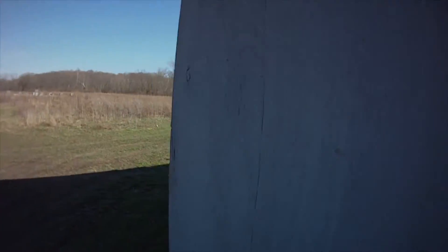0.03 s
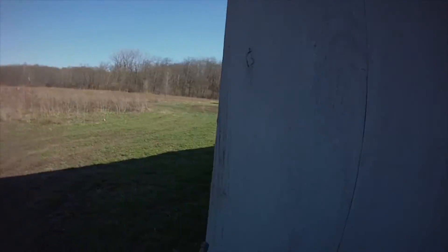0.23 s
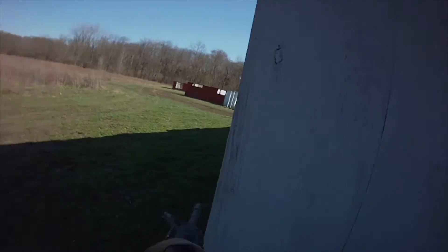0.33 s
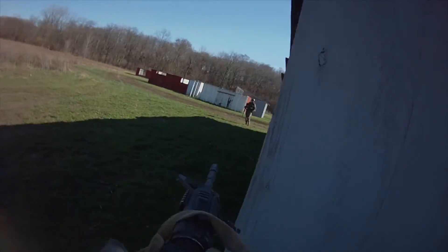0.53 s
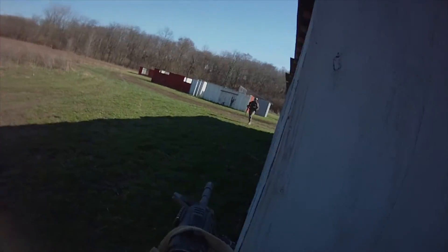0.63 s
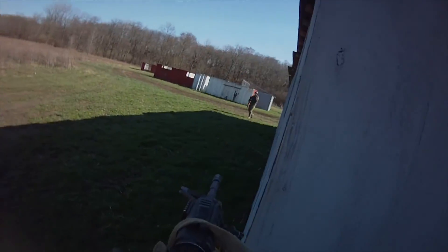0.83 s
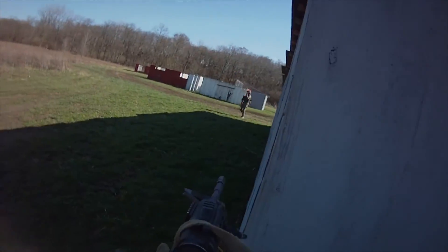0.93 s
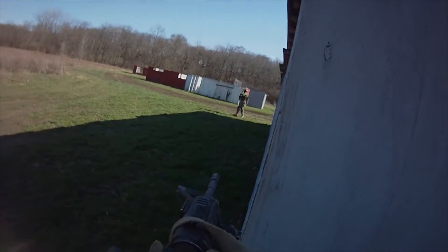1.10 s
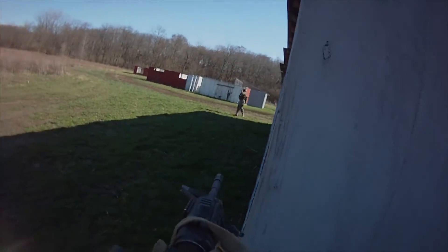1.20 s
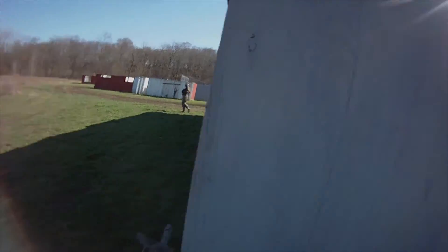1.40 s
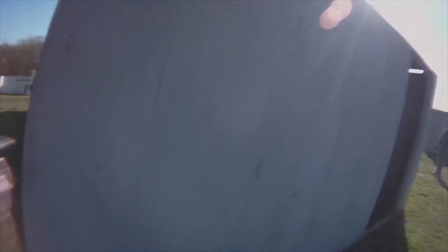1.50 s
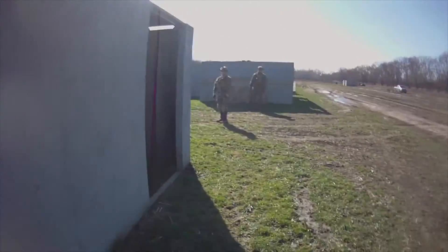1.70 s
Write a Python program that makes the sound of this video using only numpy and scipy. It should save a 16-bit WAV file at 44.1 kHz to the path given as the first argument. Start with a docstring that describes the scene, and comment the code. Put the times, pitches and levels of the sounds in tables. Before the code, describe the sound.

An electric airsoft gun fires six shots, close and dry, on an open field. First come faint clicks and cloth rustle over low wind, with dull hollow knocks at 0.24 and 0.34-0.44 s. From 0.5 s the motor whirs, gears whine downward, and pistons clack about every 0.14 s from 0.61 to 1.32. The whir fades; small clicks follow, then a thin ring and rustle near 1.72.

```python
"""Faint clicks and cloth rustle over a low outdoor floor, then dull knocks, then six quick airsoft shots.
The place is outdoors beside a wall (no echo is computed); the microphone is a helmet camera in a closed housing.
For each shot the motor spins up (hum, coloured noise), the gears whine down under the spring's load (sines),
a catch clicks and the piston slams (struck casing modes). Wind and rustle are shaped noise; knocks are
decaying tones with a crack. After the last shot come small clicks, a thin ring and more rustle."""
import sys
import numpy as np
from scipy import signal
from scipy.fft import rfft, irfft
from scipy.io import wavfile
from scipy.ndimage import uniform_filter1d

SR = 44100
rng = np.random.default_rng(int(sys.argv[2]) if len(sys.argv) > 2 else 0)


def to_linear_factor(level_db):
    """Convert decibel levels (scalar or array-like) to linear amplitude factors."""
    exponent = np.asarray(level_db, float) / 20
    return 10 ** exponent


def bounce(signal):
    """Save signal as a 16-bit WAV file at the path given by the first command-line argument."""
    frames = np.transpose(np.atleast_2d(signal))
    limited = np.clip(frames, -1, 1)
    pcm = np.round(limited * 32767).astype(np.int16)
    wavfile.write(sys.argv[1], SR, pcm)


N = 77175  # samples, 1.75 s

# casing modes that a blow rings: (nominal f/Hz, t60/s)
MODES = [(330, 0.041), (450, 0.044), (580, 0.04), (1400, 0.017), (2700, 0.016), (3900, 0.013),
         (5000, 0.0033), (6800, 0.0078), (10000, 0.00047)]
# piston slams: (t/s, level/dB)
SLAMS = [(0.6121, -4), (0.7641, -1), (0.9052, -1), (1.0507, -0.5), (1.1775, -1.5), (1.3229, -1.5)]
# catch clicks, two for the first shot: (t/s, level/dB)
CATCHES = [(0.5512, -5.5), (0.5554, -2), (0.7127, -3), (0.8552, -4), (1.0001, -3), (1.1273, -1),
           (1.273, -2)]
BURST = 600  # samples in a contact's noise burst
STRIKE = 3.8  # first contact against the rattle that follows
UPPER_MODES_HZ = 2000  # modes above this answer the rattle


def curve(t, rows, axis=1):
    """Join table rows with straight lines."""
    rows = np.array(rows, float)
    return np.interp(t, rows[:, 0], rows[:, axis])


def colour(x, points):
    """Shape a spectrum by (f/Hz, level/dB) points on a log axis."""
    hz = np.maximum(np.arange(N // 2 + 1) * SR / N, 1)
    p = np.array(points, float)
    gain_db = np.interp(np.log(hz), np.log(p[:, 0]), p[:, 1])
    return irfft(rfft(x) * to_linear_factor(gain_db), N)


def unit(x):
    """Scale to rms 1."""
    return x / np.sqrt(np.mean(x ** 2))


def band(x, hz, width):
    """Steep resonance: a band-pass applied twice."""
    b, a = signal.iirpeak(min(hz, SR * 0.45), hz / width, fs=SR)
    return signal.lfilter(b, a, signal.lfilter(b, a, x))


def walk(rate):
    """Smooth random wander, spread 1, averaged twice over 1 / rate seconds."""
    k = int(SR / rate)
    return unit(uniform_filter1d(uniform_filter1d(rng.standard_normal(N), k), k))


def decay(s):
    """Short falling envelope with time constant s."""
    return np.exp(-np.arange(BURST) / (s * SR))


def contacts(shape, fall_s):
    """Noise bursts that open with a sharp contact and rattle away."""
    bursts = rng.standard_normal((*shape, BURST)) * decay(fall_s)
    bursts[..., 0] += STRIKE
    return bursts


def ring(hz, t60, rise, size=3000):
    """A decaying mode with a soft start."""
    t = np.arange(size) / SR
    fall = np.exp(-np.log(1000) * t / t60)
    return np.sin(2 * np.pi * hz * t) * fall * (1 - np.exp(-t / rise))


def add(out, x, s):
    """Mix x into out at time s."""
    i = int(s * SR)
    out[i:i + len(x)] += x[:N - i]


def blows(events, drive, rattle_s):
    """A blow rattles against the upper casing modes and gives the low ones a single push."""
    out = np.zeros(N)
    shape = (len(events), len(drive))
    rattle = contacts(shape, rattle_s)
    tune = 1 + 0.02 * rng.standard_normal(shape)  # no two blows ring quite alike
    for (s, db), bursts, shifts in zip(events, rattle, tune):
        for (hz, t60), (mode_db, lag), burst, shift in zip(MODES, drive, bursts, shifts):
            x = ring(hz * shift, t60, 0.00015)
            if hz > UPPER_MODES_HZ:
                x = signal.fftconvolve(x, burst)
            add(out, to_linear_factor(db + mode_db) * x / np.abs(x).max(), s + abs(lag))
    return out


def field():
    """Light wind and far-off outdoor noise: common part and left-right part, both slowly wavering."""
    # colour of the outdoor floor: (f/Hz, level/dB)
    floor_colour = [(15, -58), (25, -19), (107, -2), (289, -2), (389, -1.5), (495, -4), (703, -19),
                    (1530, -16), (2170, -22), (3170, -19), (3630, -15), (4150, -19.5), (15500, -32.5)]
    # further colour of the part unlike left and right: (f/Hz, level/dB)
    wide_colour = [(30, -23), (120, -32), (400, -25), (1000, -44), (3000, -22.5), (12000, -3.5)]
    parts = []
    for _ in range(2):
        noise = unit(colour(rng.standard_normal(N), floor_colour))
        parts.append(noise * to_linear_factor(-47.5 + 1.25 * walk(12.4)))
    mid, side = parts
    return mid, colour(side, wide_colour)


def rustle(t):
    """Cloth and straps: grainy noise that flickers."""
    # swells of the rustle: (t/s, level/dB)
    swells = [(0, -48), (.1, -45.5), (.18, -58.5), (.25, -36.5), (.3, -33), (.36, -29), (.42, -33.5),
              (.47, -44), (.6, -33), (1.36, -40), (1.44, -46.5), (1.55, -47), (1.69, -44.5), (1.72, -38.5),
              (1.75, -36.5)]
    # colour of the cloth: (f/Hz, level/dB)
    cloth_colour = [(35, -50), (60, -8), (149, -19), (327, -0.5), (627, 4), (1070, -17), (1260, -7.5),
                    (1670, -14.5), (2200, -8.5), (2530, -5), (4300, -9), (5500, -21), (13200, -32.5),
                    (15500, -43)]
    grains = rng.standard_normal(N) * to_linear_factor(3.3 * walk(80) + 2.0 * walk(1300))
    return unit(colour(grains, cloth_colour)) * to_linear_factor(curve(t, swells))


def ticks():
    """Small clicks of buckles and trigger, each ringing mostly the modes near the region it strikes."""
    # clicks: (t/s, level/dB, f/Hz of the casing region struck)
    clicks = [(0.0154, -31.5, 4300), (.063, -31, 3800), (0.0854, -30, 3540), (0.091, -30.5, 3350),
              (0.123, -37.5, 4400), (0.13, -42, 6500), (0.1444, -38.5, 6500), (0.1927, -23.5, 3000),
              (0.227, -31, 6000), (.239, -30.5, 7400), (.2902, -23.5, 4170), (0.316, -28, 3050),
              (0.337, -34, 4000), (0.486, -34, 6400), (1.398, -52, 3940), (1.4053, -44, 2800),
              (1.411, -29.5, 3900), (1.412, -28, 3340), (1.428, -36, 5540), (1.4619, -24.5, 3730),
              (1.4808, -28.5, 5400), (1.5423, -39, 4020), (1.6132, -40, 3680)]
    fall_db = 16.5  # per octave away from the region struck
    out = np.zeros(N)
    for s, db, centre in clicks:
        drive = [(-fall_db * abs(np.log2(hz / centre)), 0) for hz, _ in MODES]
        out += blows([(s, db)], drive, 0.002)
    return out


def rings():
    """Thin tones of straps and casing that swell and die."""
    # tones: (t/s, level/dB, f/Hz, t60/s, rise/s)
    thin_tones = [(.3, -22, 2200, 0.072, .006), (.556, -29.5, 220, 0.29, 0.0079),
                  (1.722, -27.5, 1520, 0.035, 0.0031), (1.72, -40, 2100, 0.09, .006)]
    out = np.zeros(N)
    for s, db, hz, t60, rise in thin_tones:
        add(out, to_linear_factor(db) * ring(hz, t60, rise, size=7000), s)
    return out


def knocks():
    """Dull knocks on the housing: a hollow tone, two neighbours and a short crack."""
    # knocks: (t/s, tone level/dB, f/Hz, t60/s, crack level against the tone/dB)
    hits = [(0.2424, -9.5, 641, 0.018, -12.5), (.337, -9.5, 596, 0.033, -0.5),
            (.3455, -6, 630, 0.0088, 1.5), (.352, -7, 802, 0.016, -2), (.361, -3.5, 642, 0.018, -6),
            (0.408, -13.5, 693, 0.017, -9), (0.4317, -5.5, 606, 0.0102, 5.5), (.438, -19, 760, 0.022, -44)]
    rise_s, crack_s, crack_hz = 0.0019, 0.0016, 2400
    low_pass = signal.butter(2, crack_hz, fs=SR)
    out = np.zeros(N)
    cracks = contacts((len(hits),), crack_s)
    for (s, db, hz, t60, crack_db), crack in zip(hits, cracks):
        x = ring(hz, t60, rise_s)
        x += to_linear_factor(-13.5) * ring(hz * 1.535, t60, rise_s)
        x += to_linear_factor(-15.5) * ring(hz * 0.51, t60, rise_s)
        add(out, to_linear_factor(db) * x / np.abs(x).max(), s)
        add(out, to_linear_factor(db + crack_db) * signal.lfilter(*low_pass, crack), s)
    return out


def jolts():
    """The motor jolts the casing as it starts."""
    # jolts: (t/s, level/dB)
    starts = [(.4975, -15.5), (.506, -16), (.5135, -11.5), (.6649, -6.5), (.672, -10), (.8086, -5.5),
              (.9535, -5.5), (1.081, -10), (1.2275, -5.5)]
    # drive of each casing mode: (level/dB, lag/s)
    drive = [(-56, 0), (-13.5, 0.0034), (-40, 0.011), (-39, 0.019), (-8, 0.0011), (-8, 0), (-44, 0.02),
             (-43, 0), (-44, 0.0082)]
    return blows(starts, drive, 0.002)


def takeups():
    """The teeth take up the piston, a blow to the casing."""
    # take-ups: (t/s, level/dB)
    meets = [(.5257, -3.5), (.6844, -6), (.829, -2), (.9717, -3), (1.1028, -3.5), (1.2444, -7)]
    # drive of each casing mode: (level/dB, lag/s)
    drive = [(-52, 0.0066), (-18, 0.0082), (-26, 0.013), (-27, 0.0059), (-10, 0.0086), (-7.5, 0), (-20, 0),
             (-17, 0), (-17, 0.0021)]
    return blows(meets, drive, 0.002)


def catches():
    """The catch clicks against the casing."""
    # drive of each casing mode: (level/dB, lag/s)
    drive = [(-22, .003), (-23, 0.0077), (-14, 0.011), (-27.5, .002), (-22, 0), (-7, .004), (-7, 0.00069),
             (-6.5, 0), (-12.5, 0.0021)]
    return blows(CATCHES, drive, 0.0013)


def casing(grind, treble):
    """Gear grinding rings the casing: patchy noise bands under two envelopes, all roughened by grit."""
    # resonances that the grinding rings: (f/Hz, width/Hz, level/dB)
    resonances = [(460, 440, -23.5), (1280, 650, -26.5), (2582, 437, -2.5), (3170, 380, -7.5),
                  (3915, 780, -4), (4700, 860, -13.5), (6720, 720, -13), (8200, 1700, -16.5),
                  (10800, 2400, -19.5), (13000, 2000, -26.5)]
    split_hz = 4500  # bands above this follow the treble envelope
    out = np.zeros(N)
    for hz, width, db in resonances:
        envelope = treble if hz > split_hz else grind
        noise = unit(band(rng.standard_normal(N), hz, width))
        out += envelope * to_linear_factor(db + 2 * walk(120)) * noise
    return out * to_linear_factor(1.07 * walk(730))


def gearbox(t):
    """Shaft hum, tooth whine and grinding of each shot, all on one motor speed."""
    # motor, a row a shot: (trigger t/s, free grind level/dB, loaded grind level/dB, hum level/dB)
    motor = [(0.489, -20, -21.5, -30), (0.653, -22.5, -20.5, -29), (0.795, -30, -18.5, -30.5),
             (0.938, -22.5, -23, -29), (1.058, -23, -20, -30), (1.212, -21.5, -22.5, -29.5)]
    # whine while the spring is drawn, one list a shot: (t/s, nominal tooth f/Hz, level/dB)
    whine = [
        [(0.527, 3350, -12), (0.543, 3256, -23), (0.553, 2686, -14.5), (0.561, 2648, -11), (0.579, 2647, -17.5),
         (0.593, 2554, -11.5), (0.6, 2558, -13)],
        [(0.686, 3393, -18), (0.696, 3340, -17), (0.704, 3108, -18.5), (0.712, 2760, -11.5),
         (0.73, 2765, -14.5), (0.75, 2621, -13.5), (0.757, 2564, -19)],
        [(0.834, 3450, -17), (0.844, 3395, -15), (0.854, 2827, -15.5), (0.88, 2710, -13.5),
         (0.892, 2583, -10.5), (0.899, 2627, -11)],
        [(0.975, 3479, -14), (0.983, 3445, -18.5), (0.989, 3347, -23), (0.999, 2753, -12), (1.015, 2804, -16.5),
         (1.039, 2600, -11), (1.044, 2520, -10.5)],
        [(1.104, 3800, -20), (1.109, 3800, -10.5), (1.118, 3486, -24), (1.125, 3154, -15), (1.132, 2885, -29),
         (1.141, 2896, -20), (1.154, 2820, -17.5), (1.163, 2717, -12.5), (1.17, 2623, -12)],
        [(1.247, 3433, -24), (1.261, 3343, -19.5), (1.273, 2817, -18.5), (1.289, 2808, -17),
         (1.311, 2623, -9.5), (1.318, 2607, -11.5)],
    ]
    # overtones of the whine: (multiple of tooth pitch, level/dB)
    overtones = [(2, -38), (3, -46.5)]
    tooth_count = 5  # teeth passing per shaft turn
    start_hz, spin_up_s, coast_hz_per_s = 442.3, 0.022, 1370  # shaft speed
    grind_attack_s, grind_t60_s, treble_t60_s, hum_t60_s = 0.02, 0.22, 0.15, 0.13
    hum_light_db, treble_free_db = -4.5, -4  # hum free against loaded; treble before the whine starts
    tones, grind, treble = np.zeros(N), np.zeros(N), np.zeros(N)
    wobble = 1 + 0.003 * walk(220)  # of the speed
    rough = 1 + 0.12 * walk(550)  # of the whine level
    throb = 1 + 0.15 * walk(110)  # of the hum level
    # the first catch click is skipped, leaving one a shot
    shots = zip(motor, whine, SLAMS, CATCHES[1:])
    for (start, free_db, load_db, hum_db), rows, (slam_s, _), (catch_s, _) in shots:
        on, off = rows[0][0], rows[-1][0]
        after = np.clip(t - slam_s, 0, 1)

        # speed rises to the whine's first pitch, follows it, then sags for 0.1 s after the slam
        drawn = curve(t, rows) / tooth_count
        up = 1 - np.clip((on - t) / spin_up_s, 0, 1) ** 2
        shaft = start_hz + (drawn - start_hz) * up
        shaft -= coast_hz_per_s * np.clip(t - slam_s, 0, 0.1)
        phase = 2 * np.pi * np.cumsum(shaft * wobble) / SR

        loaded = np.clip((t - on) / 0.001, 0, 1) * np.clip((off - t) / 0.0012 + 1, 0, 1)
        teeth = to_linear_factor(curve(t, rows, axis=2)) * np.sin(tooth_count * phase)
        for multiple, db in overtones:
            teeth += to_linear_factor(db) * np.sin(multiple * tooth_count * phase)

        run = np.clip((t - start) / grind_attack_s, 0, 1)
        load = np.clip((t - catch_s) / 0.0042, 0, 1)
        hum_level = to_linear_factor(hum_db + hum_light_db * (0.5 - load) - 60 * after / hum_t60_s)
        hum = run * hum_level * np.sin(phase)
        tones += np.sqrt(2) * (rough * loaded * teeth + throb * hum)  # levels are rms

        # grinding pulses slightly with each shaft turn
        rub = run * to_linear_factor(free_db + (load_db - free_db) * load) * (1 + 0.05 * np.sin(phase))
        grind += rub * to_linear_factor(-60 * after / grind_t60_s)
        treble += rub * to_linear_factor(treble_free_db * (t < on) - 60 * after / treble_t60_s)
    return tones + casing(grind, treble)


def slams():
    """The piston hits the cylinder head and at once hits again; only the upper modes tell the two apart."""
    # drive of each casing mode: (level/dB, lag/s)
    drive = [(-14.5, 0.00042), (-13.5, 0.00095), (-9, 0.00208), (-13.5, 0.00236), (-14.5, 0.00039),
             (-5.5, .0003), (-14, 0.0004), (-8.5, 0.00032), (-13.5, 0.00056)]
    again = []
    for (hz, _), (db, _) in zip(MODES, drive):
        again.append((db if hz > UPPER_MODES_HZ else -np.inf, 0))
    rebounds = [(s + 0.003, db - 0.5) for s, db in SLAMS]
    return blows(SLAMS, drive, 0.0017) + blows(rebounds, again, 0.0017)


def stereo_smear(near):
    """Near sound spread by a short noise tail and coloured: its left-right part."""
    # colour of the left-right part: (f/Hz, level/dB)
    side_colour = [(30, -16), (120, -11), (300, -62), (1000, -22), (2500, -30), (5000, -39), (12000, -24.5)]
    smear = rng.standard_normal(BURST) * decay(0.0013)
    smear /= np.sqrt(np.sum(smear ** 2))
    return colour(signal.lfilter(smear, 1, near), side_colour)


def scene():
    """All sources, almost the same on both channels; the housing cuts the bass of near sounds but rustle."""
    t = np.arange(N) / SR
    far, wide = field()
    near = ticks() + rings() + knocks()
    near += jolts() + takeups() + catches()
    near += gearbox(t) + slams()
    housing = signal.butter(2, 230, "high", fs=SR)  # cut-off in Hz
    near = signal.lfilter(*housing, near) + rustle(t)
    side = stereo_smear(near) + wide
    return np.array([near + far + side, near + far - side])


def top_cut(x):
    """Nothing passes above the cut-off."""
    return signal.sosfilt(signal.butter(12, 15800, fs=SR, output="sos"), x)


def record(dry):
    """The camera's input stage clips the loudest peaks at full scale."""
    mix = np.clip(dry, -1, 1)
    return top_cut(mix)


dry = scene()
out = record(dry)
bounce(out)
```